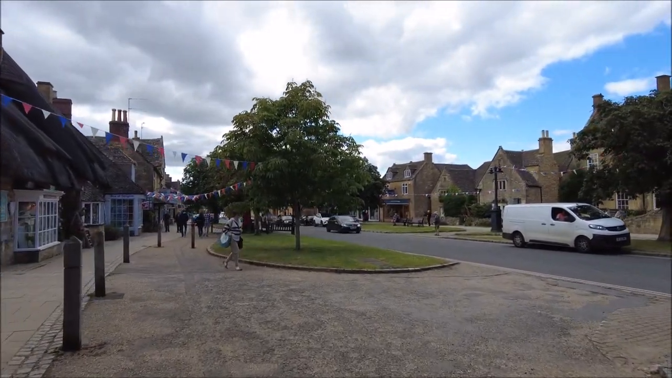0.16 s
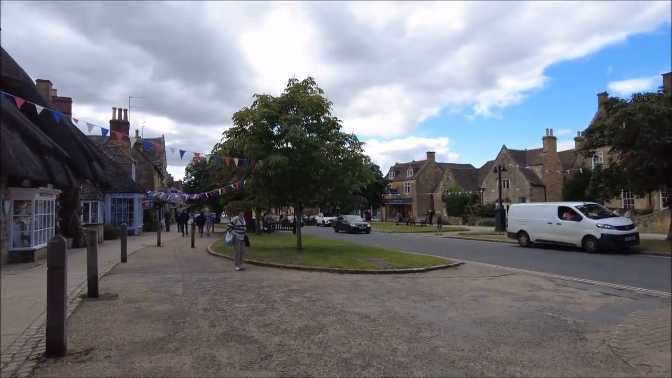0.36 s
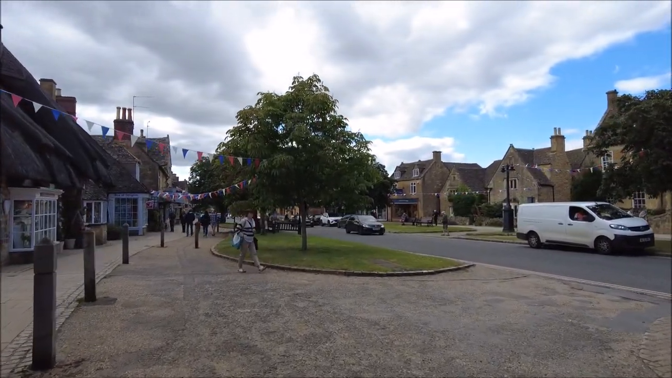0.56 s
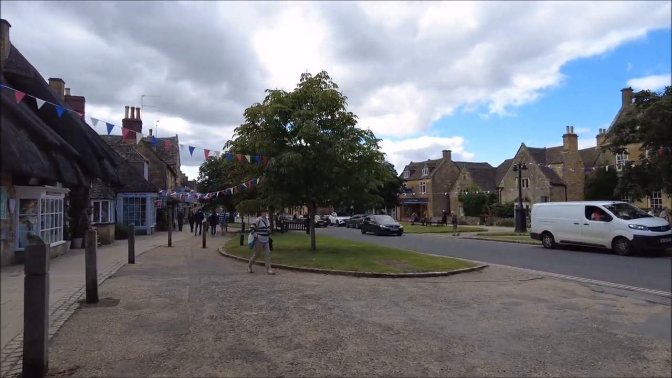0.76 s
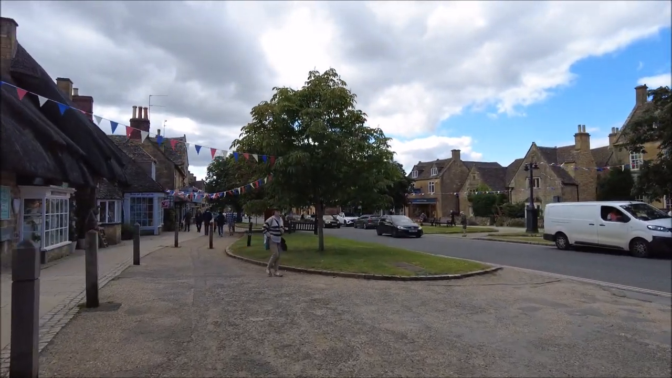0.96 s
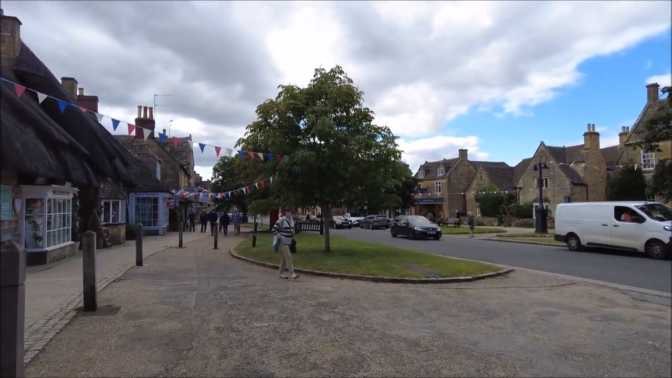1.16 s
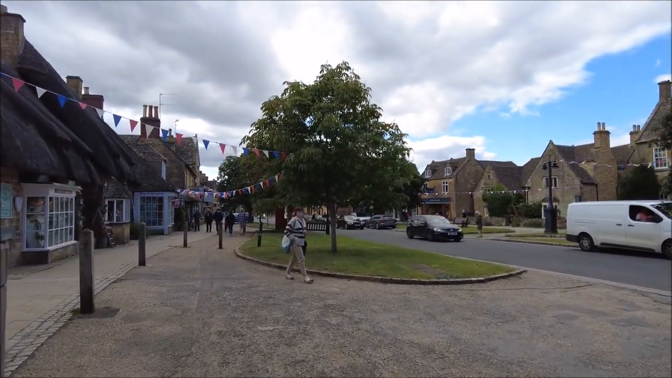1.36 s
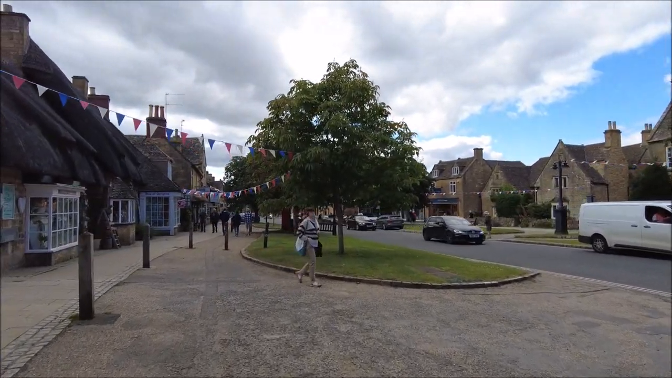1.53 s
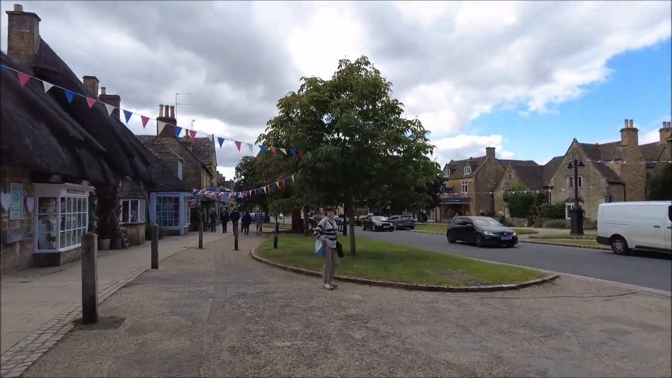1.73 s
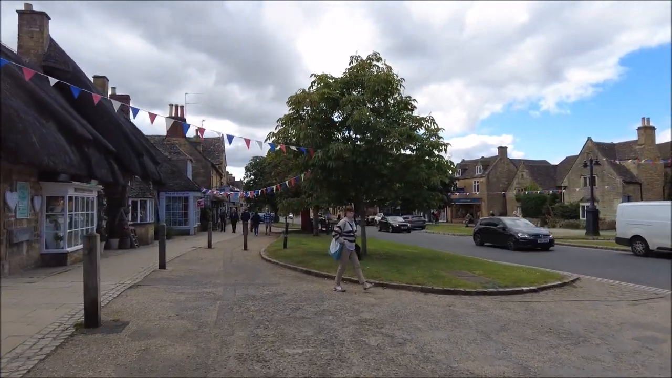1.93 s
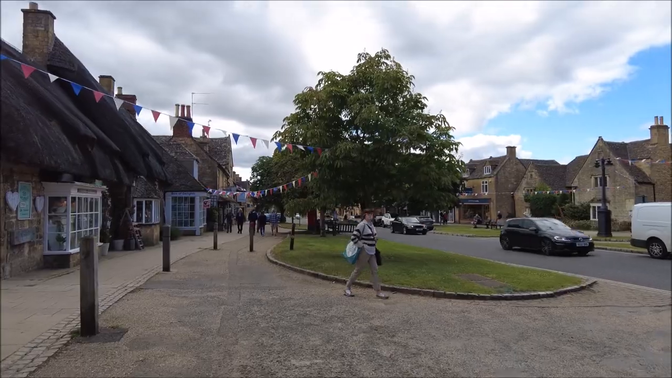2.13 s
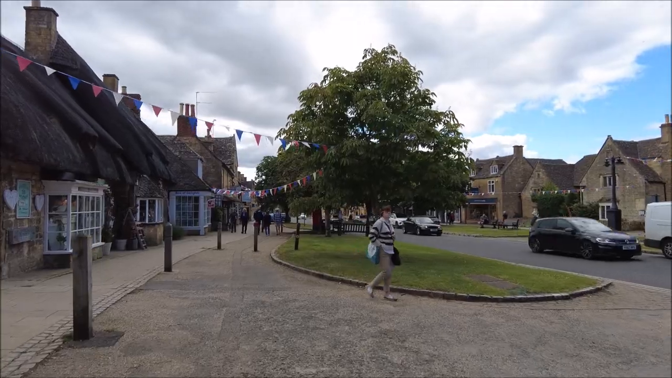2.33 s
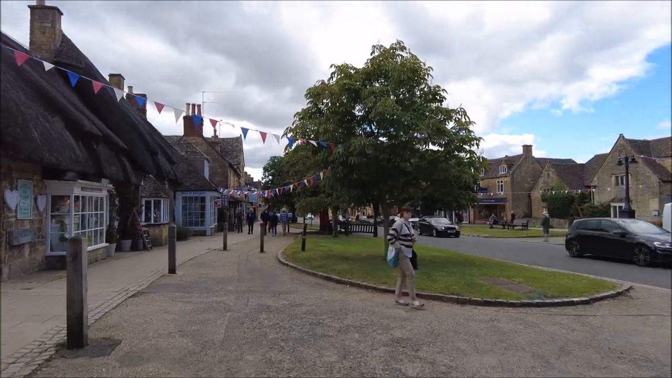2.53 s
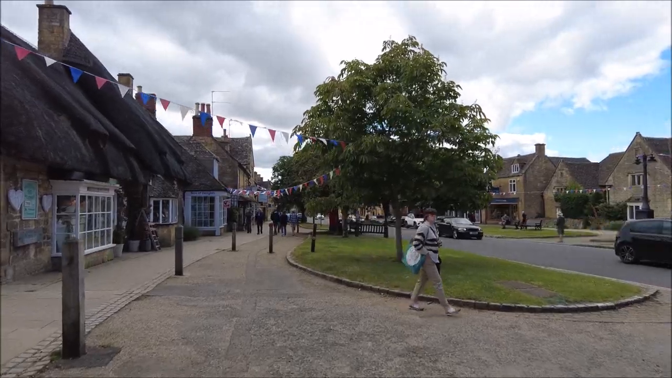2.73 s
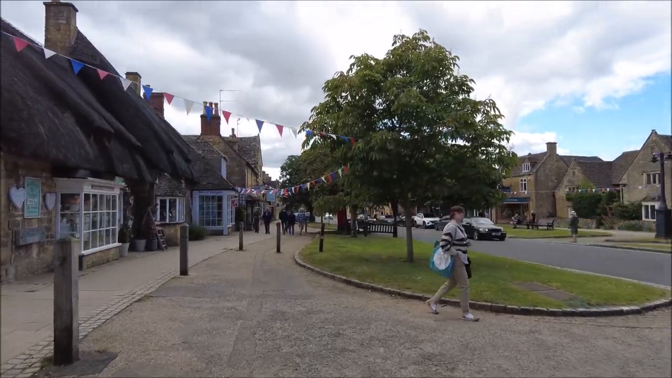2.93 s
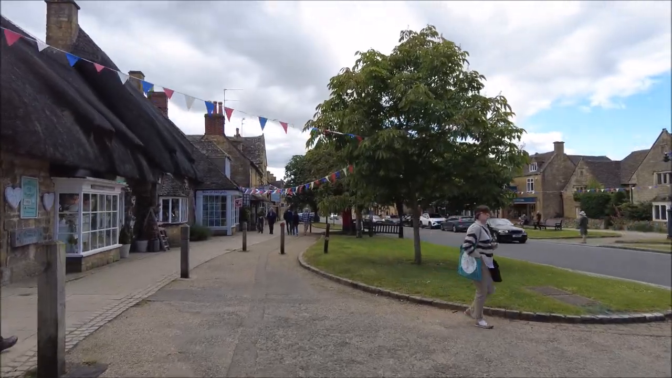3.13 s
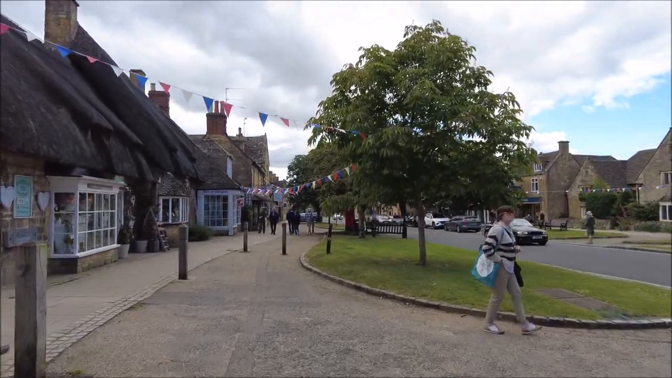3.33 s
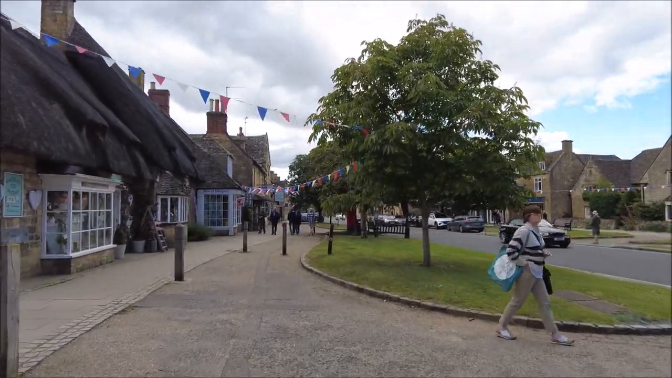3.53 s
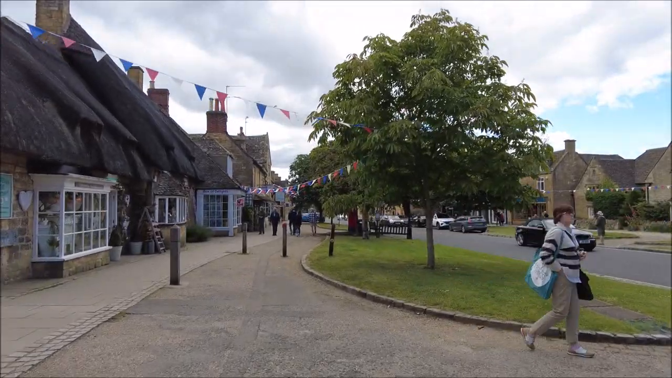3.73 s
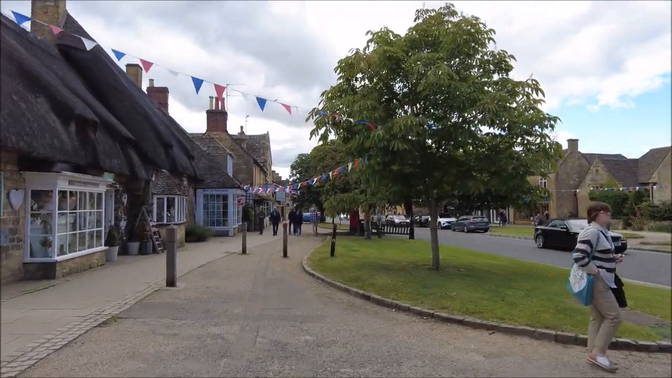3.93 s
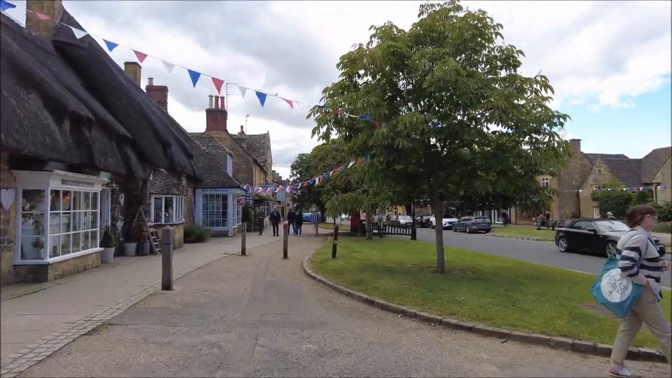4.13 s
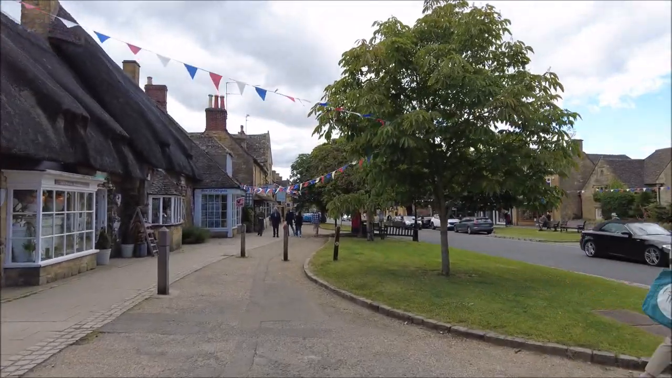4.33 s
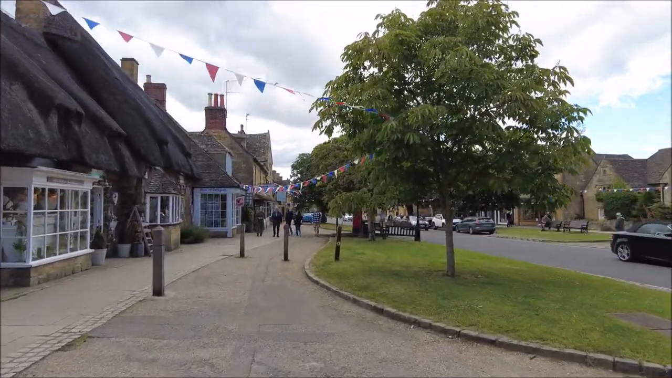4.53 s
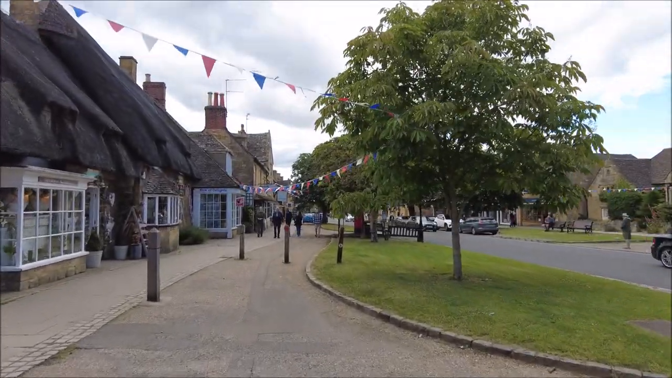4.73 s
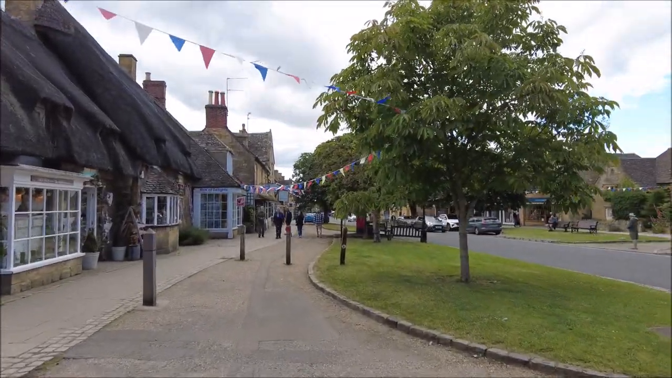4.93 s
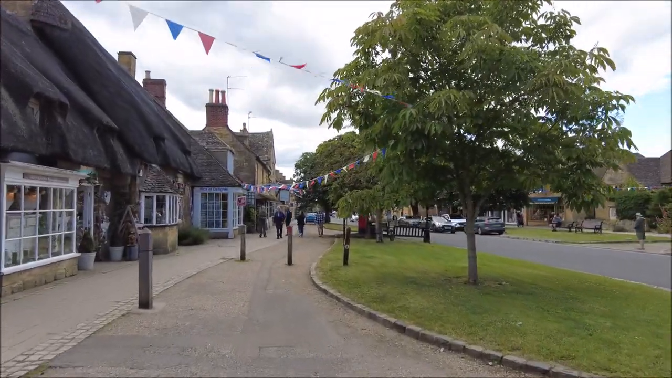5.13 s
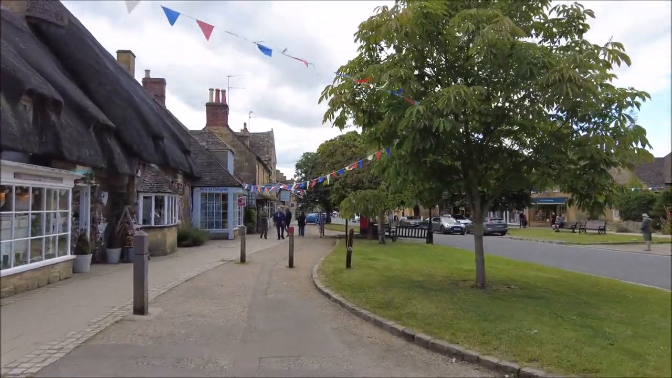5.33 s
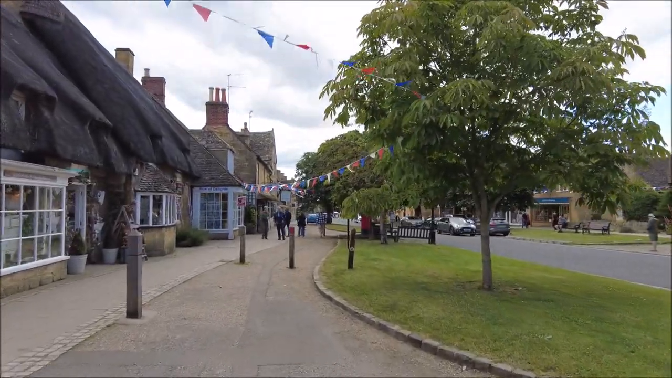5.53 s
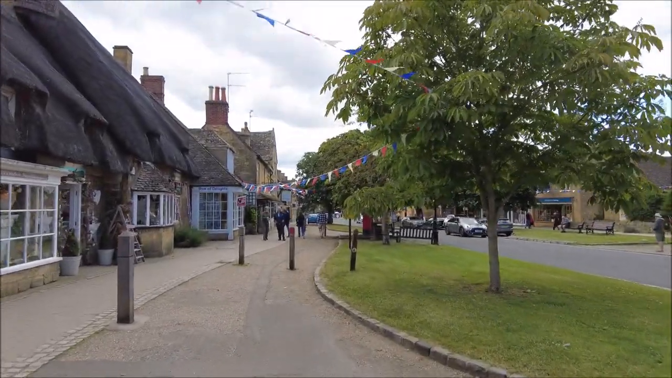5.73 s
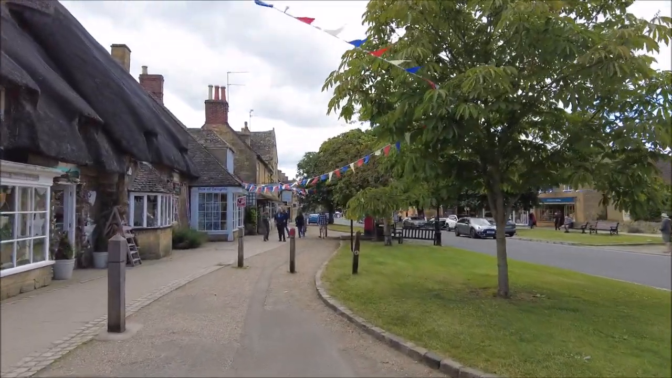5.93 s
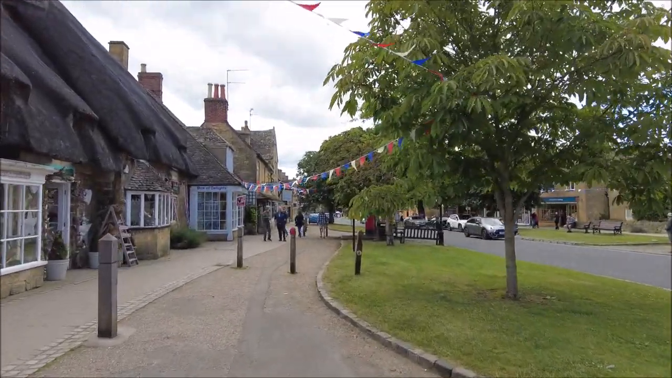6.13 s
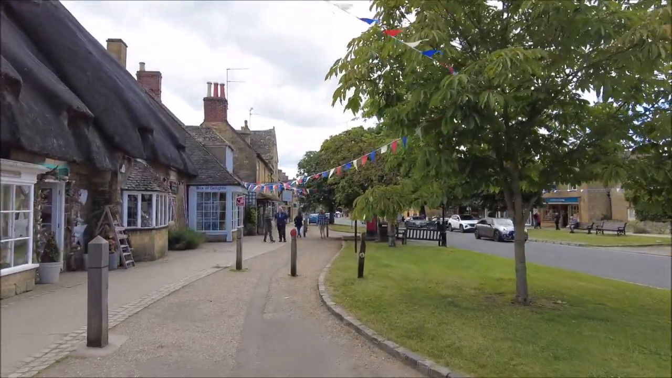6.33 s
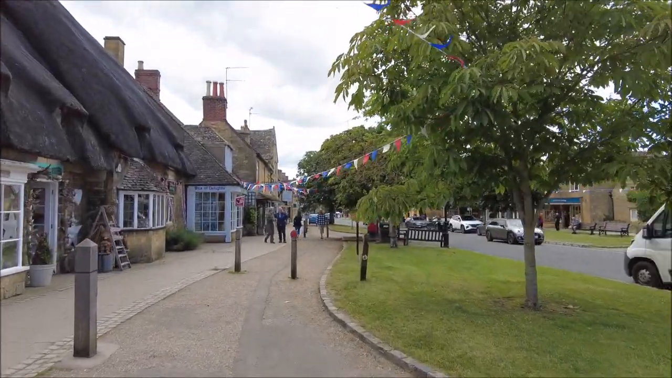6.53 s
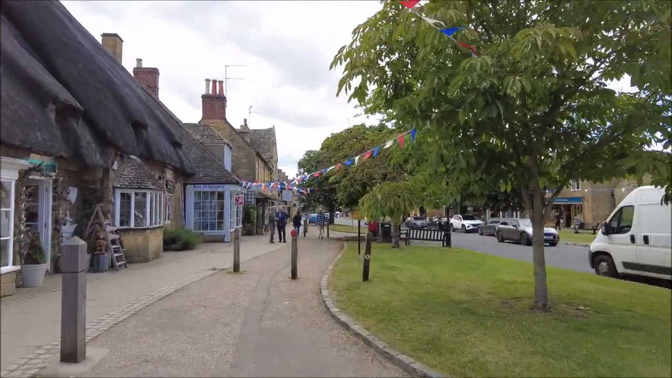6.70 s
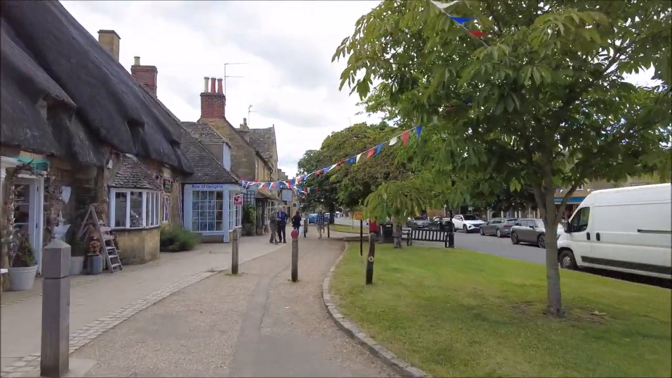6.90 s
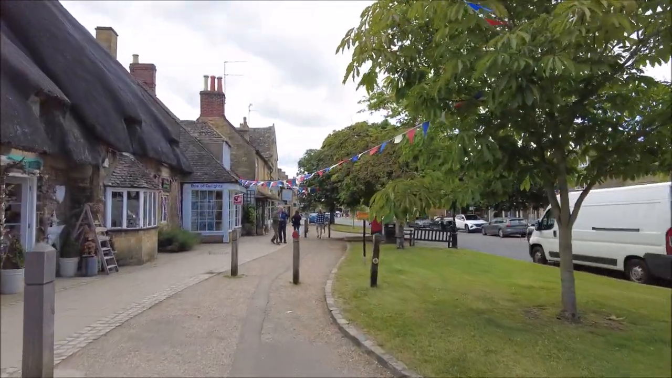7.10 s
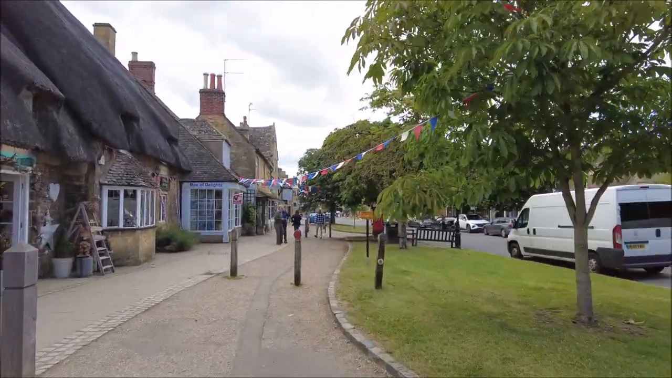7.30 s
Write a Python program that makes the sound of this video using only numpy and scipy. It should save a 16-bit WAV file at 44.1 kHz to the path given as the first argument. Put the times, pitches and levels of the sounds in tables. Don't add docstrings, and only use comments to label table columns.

```python
import sys
import numpy as np
from scipy import signal
from scipy.fft import rfft, irfft
from scipy.io import wavfile
from scipy.ndimage import uniform_filter1d

SR = 44100
rng = np.random.default_rng(int(sys.argv[2]) if len(sys.argv) > 2 else 0)


def wav_out(sig):
    wavfile.write(sys.argv[1], SR, np.round(np.clip(np.atleast_2d(sig).T, -1, 1) * 32767).astype(np.int16))


def invert_db(level):
    return 10 ** (np.asarray(level, dtype=float) / 20)


N = 328986

# f/Hz, level/dB
WIND_COLOUR = [(10, -11), (25, 5.5), (40, -26.5), (60, 1), (85, -7)]
IDLING_COLOUR = [(35, -17), (55, -36), (80, -5.5), (105, 8), (135, -5), (170, -3.5)]
HUM_COLOUR = [(110, -16), (150, -1.5), (190, -3), (235, 2.5), (280, -1.5), (330, -5.5), (420, -9.5),
              (560, -14.5), (700, -19.5)]
TYRE_COLOUR = [(380, -14.5), (600, -7.5), (720, 0.5), (850, 0), (1000, 2), (1150, -14), (1400, -28)]
ROAR_COLOUR = [(850, -14), (1150, -5.5), (1300, -1), (1650, -3.5), (1850, -7), (2050, -11.5), (2900, -14.5),
               (3600, -21.5)]
HISS_COLOUR = [(1600, -37), (2400, -6), (3100, 0), (3750, -1), (4400, 0), (5800, -5.5), (6900, -9),
               (7800, -7.5), (8600, -12.5), (9400, -11), (10200, -14), (11000, -13), (13000, -19.5),
               (15900, -20.5)]
# f/Hz, side minus mid level/dB,
# in-phase correlation/1, quadrature correlation/1
PORT_RESPONSE = [(60, -29, -0.85, -0.28), (170, -12.5, -0.031, -.1), (340, -7.5, -0.13, -0.77),
                 (516, -1, 0.051, -.7), (700, 6.5, 0.065, -.5), (920, 16, 0.57, -0.35),
                 (1200, -2.5, -0.059, 0.35), (1450, -8.5, -0.43, -0.81), (2210, -3, -0.31, -0.57),
                 (3800, 3.5, -0.52, 0), (5860, 8.5, -0.5, .1), (8000, 5, -0.46, .1), (11140, 6, -0.53, 0),
                 (15000, 3, -.4, 0.2)]
# t/s, level/dB, half length/s
WIND_GUSTS = [(0, -35, 0.013), (0.34, -46.5, 0.24), (0.774, -44, 0.034), (0.968, -41.5, 0.14),
              (1.262, -52, 0.034), (2.158, -46, 0.046), (3.03, -39, 0.018), (3.419, -48, 0.022),
              (3.6, -49, 0.063), (4.062, -33.5, .06), (4.526, -41, 0.21), (5.103, -43, 0.2),
              (5.754, -35, 0.052), (5.962, -33, 0.082), (6.176, -38, 0.084), (6.702, -28, 0.11),
              (7.3, -42, .08)]
# t/s, heavy tyre roar level/dB
TRAFFIC_APPROACH = [(0, -56.5), (.6, -56.5), (1.7, -54.5), (2.3, -53.5), (2.9, -50), (3.6, -49.5),
                    (4.35, -48), (4.55, -46.5), (5.3, -43.5), (5.7, -45), (6, -47.5), (6.75, -46.5),
                    (7.46, -47.5)]
# closest t/s, distance over speed/s, level/dB
LIGHT_CARS = [
    (1.38, 0.04, -48.5),
    (2.9, 0.71, -45.5),
]
# t/s, firing rate f/Hz, firing tone level/dB
FIRING = [(0, 55.58, -45), (1.2, 55, -42), (1.6, 50.9, -42), (2.1, 54.4, -42), (3.06, 52.17, -34),
          (3.5, 53.02, -36.5), (3.95, 53.97, -32), (4.86, 52.8, -28.5), (5.45, 54.3, -27.5),
          (5.92, 58.3, -22), (6.3, 60.5, -23), (6.74, 62.6, -15.5), (7.1, 64.6, -14), (7.46, 67, -12)]
# t/s, depth/dB (negative reinforces), half width/s
ECHO_FADES = [(.64, 15, .04), (.8, -13, .04), (.88, 12, .03), (1.42, 18, .06), (1.71, 14, .04),
              (1.92, 8, .05), (2.2, 8, .05), (2.45, -4, .08), (2.62, 10, .1), (3.3, 7, .07), (4.15, 9, .04),
              (4.41, 15, .05), (4.56, -8, .025), (4.7, 11, .06), (4.96, 4, .03), (5.13, 12, .035),
              (5.27, 6, .025), (5.46, 16, .035), (5.62, 7, .03), (5.78, 13, .04), (5.92, -3, .04),
              (6.05, 10, .04), (6.22, 4, .03), (6.36, 8, .03), (6.53, 3, .05), (7.0, 4, .12)]
# order/1, t/s, half length/s, level/dB
HARMONIC_BLOOMS = [(2, .25, .25, -46), (2, 2.62, .05, -39), (2, 2.83, .13, -39), (2, 3.38, .1, -39),
                   (2, 3.85, .18, -41), (2, 4.2, .09, -38), (2, 5.1, .35, -41), (2, 5.75, .3, -40),
                   (2, 6.2, .2, -38), (2, 6.68, .22, -32), (2, 7.35, .2, -35), (3, 7.1, .3, -41),
                   (4, 4.1, .2, -45), (4, 4.75, .28, -41), (4, 6.35, .2, -45), (6, 6.4, .25, -47)]
# t/s, level/dB, low edge f/Hz, tilt/(dB per octave)
SOLE_SCUFFS = [
    (0, -69, 7500, -10),
    (.335, -66, 3500, -7),
    (1.009, -45, 900, -13),
    (1.92, -77, 9000, -9),
    (2.1, -77, 10000, -9),
    (7.32, -72, 10000, -6),
]
# t/s, peak level/dB, ring f/Hz, T60/s, left minus right level/dB
HEEL_TAPS = [(.4622, -35, 2350, .009, -2), (.4618, -45, 3400, .006, -2), (.853, -49, 3000, .012, 0),
             (.954, -36, 1050, .012, 0), (.979, -57, 6500, .008, 0), (1.0115, -25, 800, .022, 1),
             (1.0125, -23.5, 1200, .018, 1), (1.0175, -21, 350, .045, 1), (1.0328, -21.5, 1500, .013, 1),
             (1.055, -60, 8500, .006, 0), (1.0655, -50, 9500, .005, 0), (1.415, -43, 3000, .012, 0),
             (1.943, -44, 3000, .012, 0), (1.954, -36, 1150, .07, 0), (2.529, -33, 880, .03, 0)]
# t/s, f/Hz, level/dB
BRAKE_SQUEAK = [
    (3.58, 14050, -96),
    (3.65, 14300, -89),
    (3.76, 14700, -84),
    (3.88, 14950, -94),
]
# level/dB, low edge f/Hz, tilt/(dB per octave), T60/s
VALVE_JETS = [
    (-48.5, 4500, -7.5, .32),
    (-50, 4750, -90, .04),
]
# t/s, width factor on the side signal/1
STEREO_WIDTH = [(0, .32), (1.0, 0.38), (1.27, 0), (1.9, 0.022), (3.7, 0.41), (5.4, 0.73), (7.46, 0.69)]

FAR_DB = -57
CALM_DB, CALM_SHARE = -49.5, 0.77
IDLING_DB, IDLING_SHARE = -47.5, 0.91
HUM_DB, HUM_SHARE = -44, 0.56
UPPER_HUM_DB, UPPER_HUM_SHARE = -5, 0.8
TYRES_DB, TYRES_SHARE = -62.5, 0.91
HISS_DB, HISS_SHARE = -68.5, 0.85
BRIGHT_DB, BRIGHT_SHARE = -2, 0.17
TRAIL_DB_PER_S = 1.26
CAR_ROAR_DB = -14
CLEAR_S, CLEAR_SPAN_S, CLEAR_DB = 4.5, 0.0792, 3
SHADE_S, SHADE_DB_PER_S = 6.66, 9
VALVE_S = 6.593


def evened(x):
    return x / np.sqrt(np.mean(x ** 2) + 1e-20)


def read(hz, f, value):
    return np.interp(np.log(hz + 1), np.log(np.asarray(f) + 1), value)


def curves(rows):
    s, *columns = np.transpose(rows)
    return [np.interp(np.arange(N) / SR, s, column) for column in columns]


def bump(s, half):
    return np.exp(-((np.arange(N) / SR - s) / half) ** 2)


def wobble(per_s):
    lowpass = signal.butter(2, per_s, fs=SR, output="sos")
    return evened(signal.sosfilt(lowpass, rng.standard_normal(N)))


def add(mix, s, sound):
    part = mix[:, round(s * SR):][:, :sound.shape[1]]
    part += sound[:, :part.shape[1]]


def upper(x, edge_hz, db):
    highpass = signal.butter(3, edge_hz, "high", fs=SR, output="sos")
    return x + (invert_db(db) - 1) * signal.sosfiltfilt(highpass, x)


def nearness():
    near_db = curves(TRAFFIC_APPROACH)[0] - FAR_DB
    fall = np.arange(N) / SR * TRAIL_DB_PER_S
    return near_db, np.maximum.accumulate(near_db + fall) - fall


def wash(colour, level_db, side_db, patchy_db, size=1024):
    frames, hz = 4 * N // size + 5, np.fft.rfftfreq(size, 1 / SR)
    a, b, c, d, patches = rng.standard_normal((frames, len(hz), 5)).T
    patches = uniform_filter1d(patches, size=10, axis=0)
    patches = evened(uniform_filter1d(patches, size=12, axis=1))

    f, ratio_db, in_phase, quadrature = np.transpose(PORT_RESPONSE)
    coherence = (read(hz, f, in_phase) + 1j * read(hz, f, quadrature))[:, None]
    coherence = coherence / np.maximum(abs(coherence), 1)
    mid = a + 1j * b
    unrelated = np.sqrt(1 - abs(coherence) ** 2 + 1e-9) * (c + 1j * d)
    side = (coherence * mid + unrelated) * invert_db(read(hz, f, ratio_db) + side_db)[:, None]

    skirt_db = -36 * np.log2(np.maximum(hz / colour[-1][0], 1))
    colour_db = (read(hz, *np.transpose(colour)) + skirt_db)[:, None]
    spectrum = np.array([mid, side]) * invert_db(colour_db + patchy_db * patches)
    mid, side = signal.istft(spectrum, nperseg=size, noverlap=3 * size // 4)[1][:, :N]
    return invert_db(level_db) * np.array([mid + side, mid - side]) / np.std(mid)


def street():
    near_db, trail_db = nearness()
    gusts = sum(invert_db(db) * bump(s, half) for s, db, half in WIND_GUSTS)
    wind = wash(WIND_COLOUR, 1.6, side_db=5.0, patchy_db=0.5, size=4096)
    wind = wind * (invert_db(CALM_DB + CALM_SHARE * trail_db) + gusts)
    idling_db = IDLING_DB + IDLING_SHARE * trail_db
    idling = wash(IDLING_COLOUR, idling_db, side_db=-6.0, patchy_db=-3.0, size=4096)
    hum = wash(HUM_COLOUR, HUM_DB + HUM_SHARE * trail_db, side_db=2.5, patchy_db=0.6, size=2048)
    return wind + idling + upper(hum, 470, UPPER_HUM_DB + UPPER_HUM_SHARE * near_db)


def exhaust(turns):
    firing_db = curves(FIRING)[1]
    firing_db = firing_db - sum(db * bump(s, half) for s, db, half in ECHO_FADES)
    drone = np.sqrt(2) * invert_db(firing_db) * np.sin(2 * np.pi * turns)
    for k in (2, 3, 4, 6):
        level = sum(invert_db(db) * bump(s, half) for order, s, half, db in HARMONIC_BLOOMS if round(order) == k)
        level = level * invert_db(1.8 * wobble(8))
        drone = drone + np.sqrt(2) * level * np.sin(2 * np.pi * k * turns + k)
    return drone * invert_db(np.array([[-1.5], [1.5]]))


def tyres(knock_db):
    t, (near_db, trail_db) = np.arange(N) / SR, nearness()
    car = np.sqrt(sum(invert_db(2 * db) / (1 + ((t - s) / span) ** 2) for s, span, db in LIGHT_CARS))
    low_level = np.hypot(car, invert_db(TYRES_DB + TYRES_SHARE * trail_db))
    roar_level = np.hypot(invert_db(FAR_DB + near_db), invert_db(CAR_ROAR_DB) * car)
    low = wash(TYRE_COLOUR, 0, side_db=-9.5, patchy_db=2.0) * low_level
    return low + wash(ROAR_COLOUR, knock_db, side_db=6.0, patchy_db=1.25) * roar_level


def engine_hiss(knock_db):
    t, trail_db = np.arange(N) / SR, nearness()[1]
    hiss_db = HISS_DB + HISS_SHARE * trail_db
    hiss_db = hiss_db - SHADE_DB_PER_S * np.maximum(t - SHADE_S, 0)
    hiss_db = hiss_db + CLEAR_DB / 2 * (1 + np.tanh((t - CLEAR_S) / CLEAR_SPAN_S))
    hiss_db = hiss_db + knock_db + 0.5 * wobble(7)
    hiss = wash(HISS_COLOUR, hiss_db, side_db=-2.0, patchy_db=1.4)
    return upper(hiss, 6500, BRIGHT_DB + BRIGHT_SHARE * trail_db)


def vehicles():
    hz = curves(FIRING)[0]
    turns = np.cumsum(hz * (1 + 0.002 * wobble(6))) / SR
    knock_db = 1.6 * (np.exp(-(turns % 1) / 0.2) - 0.2) * (1 + 1.2 * wobble(40))
    return exhaust(turns) + tyres(knock_db) + engine_hiss(knock_db)


def burst(db, edge_hz, tilt_db, t60, rise, hold):
    t = np.arange(16384) / SR
    hz = np.fft.rfftfreq(len(t), 1 / SR) + 1
    colour = invert_db(tilt_db * np.log2(hz / edge_hz)) / (1 + (edge_hz / hz) ** 30)
    a, b = rng.standard_normal((2, len(t)))
    ports = np.array([0.6 * a, 0.2 * a + b])
    noise = evened(irfft(rfft(ports) * colour))
    tail_db = -60 * np.maximum(t - rise - hold, 0) / t60
    return noise * np.minimum(t / rise, 1) * invert_db(db + tail_db)


def soles():
    out = np.zeros((2, N))
    for s, db, edge_hz, tilt_db in SOLE_SCUFFS:
        add(out, s, burst(db, edge_hz, tilt_db, t60=0.1, rise=0.008, hold=0.025))
    return out


def taps():
    out, t = np.zeros((2, N)), np.arange(3000) / SR
    for s, db, hz, t60, pan_db in HEEL_TAPS:
        band = signal.butter(2, [0.7 * hz, 1.4 * hz], "band", fs=SR, output="sos")
        grit = evened(signal.sosfilt(band, rng.standard_normal((2, len(t)))))
        rise = np.sin(np.pi / 2 * np.minimum(t * hz / 1.3, 1)) ** 2
        mode = np.sin(2 * np.pi * hz * t)
        ring = (mode + 0.35 * grit) * rise * invert_db(db - 60 * t / t60)
        add(out, s, ring * invert_db(np.array([[pan_db / 2], [-pan_db / 2]])))
    return out


def brake():
    hz, db = curves(BRAKE_SQUEAK)
    t = np.arange(N) / SR
    sounding = (t > BRAKE_SQUEAK[0][0]) & (t < BRAKE_SQUEAK[-1][0])
    return sounding * invert_db(db + 4.0 * wobble(25)) * np.sin(2 * np.pi * np.cumsum(hz) / SR)


def valve():
    out = np.zeros((2, N))
    for db, edge_hz, tilt_db, t60 in VALVE_JETS:
        add(out, VALVE_S, burst(db, edge_hz, tilt_db, t60, rise=0.006, hold=0.02))
    return out


def scene():
    return street() + vehicles() + soles() + taps() + brake() + valve()


def low_pass(x):
    return signal.sosfilt(signal.butter(12, 15740, fs=SR, output="sos"), x)


def record(dry):
    mid = (dry[0] + dry[1]) / 2
    side = (dry[0] - dry[1]) / 2 * np.clip(curves(STEREO_WIDTH)[0], 0, 2)
    return low_pass(np.array([mid + side, mid - side]))


dry = scene()
out = record(dry)
wav_out(out)
```